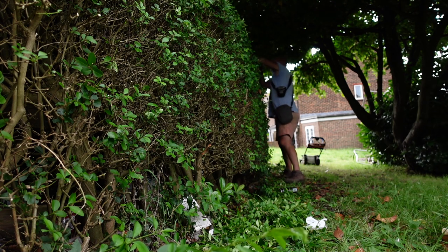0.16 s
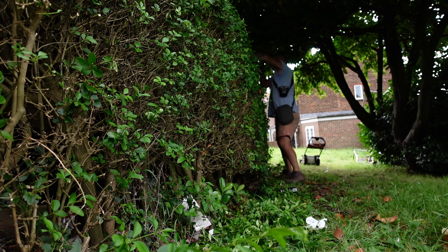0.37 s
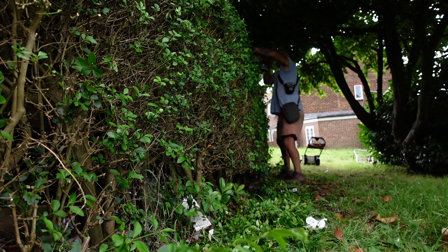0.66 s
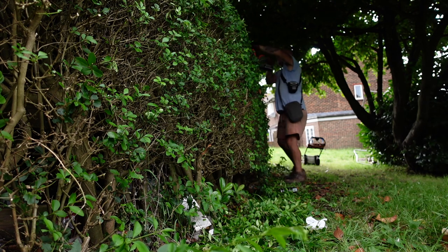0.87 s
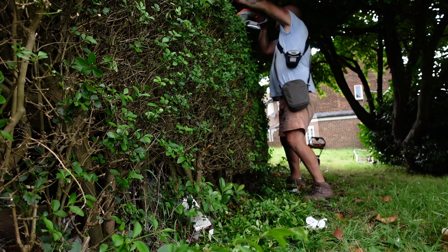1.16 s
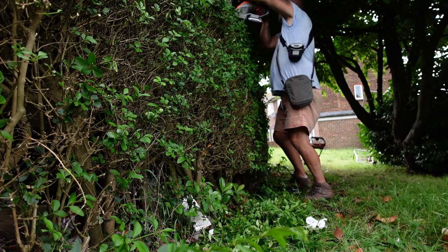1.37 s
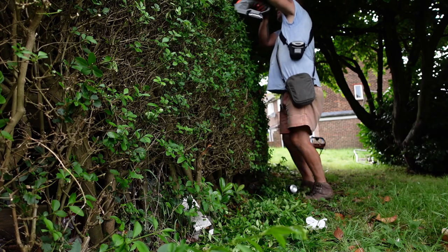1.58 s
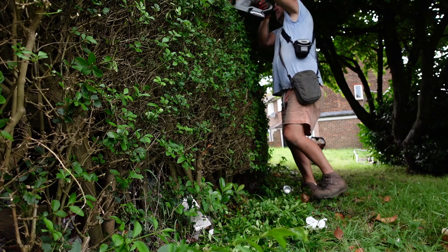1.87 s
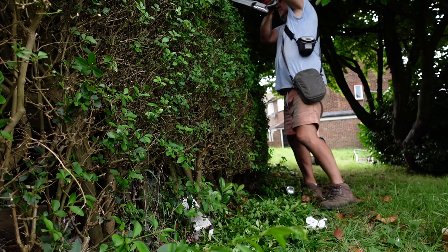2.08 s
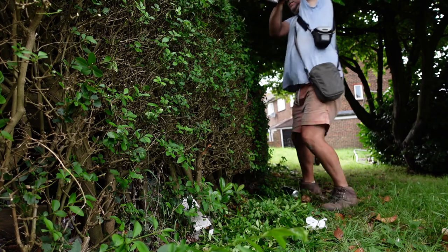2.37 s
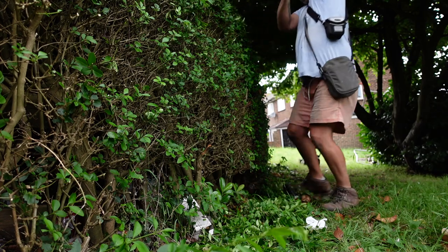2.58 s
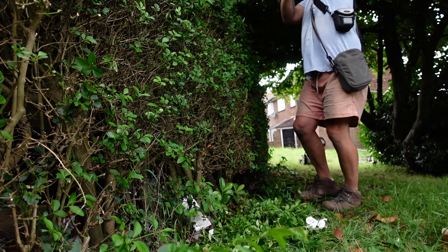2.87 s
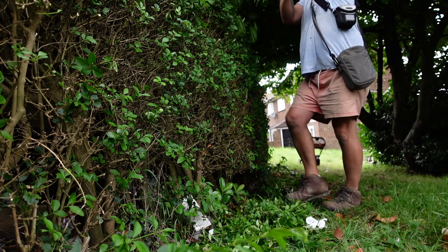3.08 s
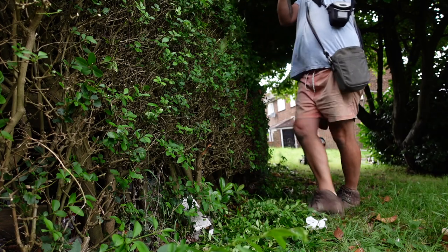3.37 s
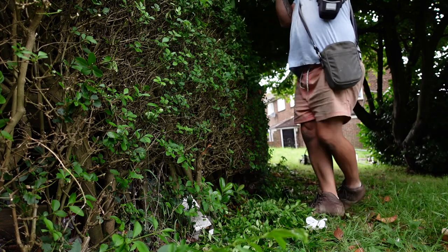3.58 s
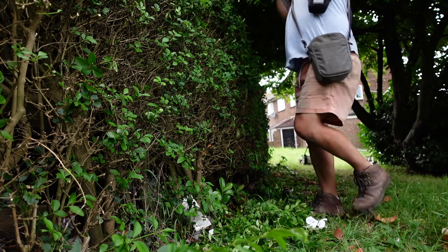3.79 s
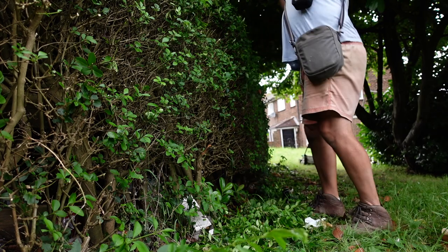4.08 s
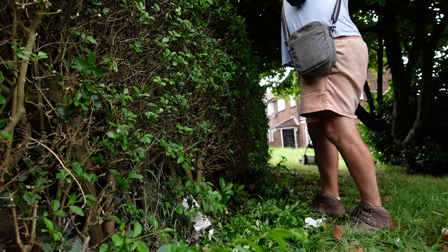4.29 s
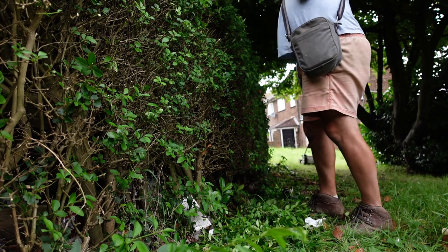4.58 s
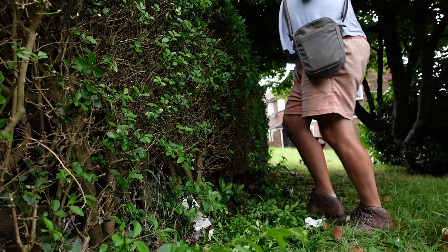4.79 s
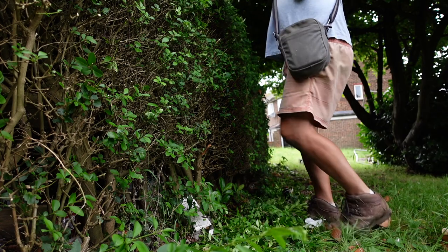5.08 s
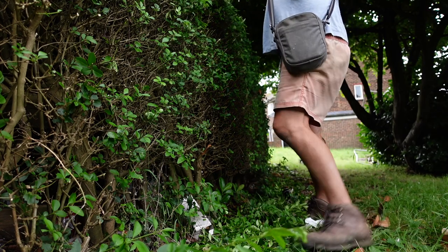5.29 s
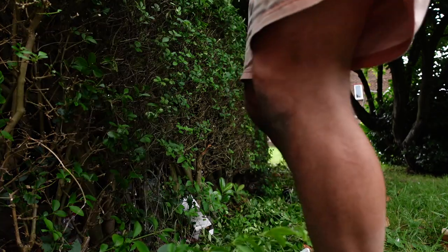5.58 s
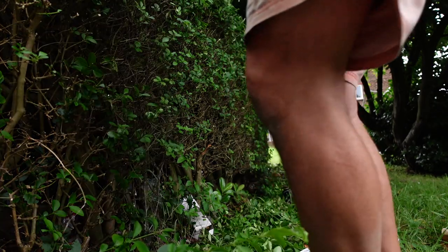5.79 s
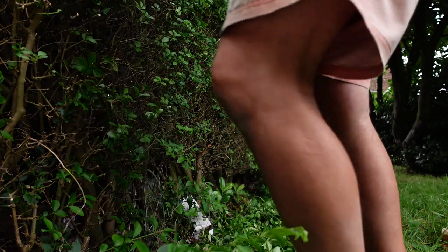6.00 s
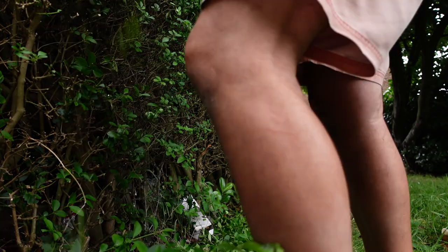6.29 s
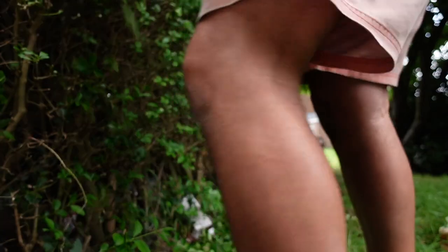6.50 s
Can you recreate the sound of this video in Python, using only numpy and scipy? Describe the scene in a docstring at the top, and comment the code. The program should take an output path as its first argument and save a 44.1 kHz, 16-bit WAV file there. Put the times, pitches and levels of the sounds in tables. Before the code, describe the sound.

An electric hedge trimmer whines roughly outdoors, its pitch sagging as it bites through crackling twigs and its blades clattering fast when it runs free.

```python
"""An electric hedge trimmer whines roughly, already biting at the start; between bites it runs free.
Its gear teeth make rough tones that sag in pitch under load, and the blades clack at each stroke when free.
Its tone and echo change at 1.17 and 5.39 s. Twigs crackle as random snaps over a steel hiss. Behind are a
filtered-noise garden rumble, a few dull thuds, and a far engine made of two low tones, silent from 5.38 s."""
import sys
import numpy as np
from scipy import signal
from scipy.fft import rfft, irfft, next_fast_len
from scipy.io import wavfile
from scipy.ndimage import uniform_filter1d, map_coordinates

SR = 44100
rng = np.random.default_rng(int(sys.argv[2]) if len(sys.argv) > 2 else 0)


def transcribe(signal):
    """Save signal, clipped to [-1, 1], as a 16-bit WAV file at the path in sys.argv[1]."""
    frames = np.atleast_2d(signal).T
    limited = np.clip(frames, -1, 1)
    pcm = np.round(limited * 32767).astype(np.int16)
    wavfile.write(sys.argv[1], SR, pcm)


N = 293265

# Garden rumble over time: time_s, low_db, upper_db
RUMBLE_LEVELS = [(0, -58, -49.5), (1.1, -59, -52), (1.28, -57, -42.5), (2.9, -58, -53), (3.4, -54, -47),
                 (4.3, -46, -52), (4.67, -43, -60), (5.35, -58, -54), (5.42, -86, -58), (5.9, -80, -57),
                 (6.1, -61, -58), (6.65, -73, -55)]
# Tone colour of the low rumble: pitch_hz, gain_db
RUMBLE_COLOUR = [(20, -22), (40, -23), (70, -6), (130, 0.5), (180, -6), (260, -21.5)]
# Far engine: time_s, firing_rate_hz, level_db, second_multiple_db
ENGINE = [(0, 82.7, -62, -71), (.6, 84.8, -67, -69.5), (1.4, 85.3, -65, -76), (2, 86.2, -68, -61),
          (2.84, 86.8, -57.5, -56), (3.12, 94.4, -50, -58), (3.2, 94.2, -60, -59), (3.3, 95.6, -49, -57),
          (3.41, 95.6, -46, -56), (3.48, 93.8, -54, -51), (3.62, 93.7, -43, -52), (3.72, 93.7, -47, -48),
          (3.81, 93.9, -54, -58), (4.0, 94, -50, -56), (4.14, 93.8, -43, -57), (4.24, 92, -58, -58),
          (4.35, 92, -51, -60), (4.45, 92.4, -63, -63), (4.52, 94.5, -52.5, -55), (4.72, 99, -51, -54.5),
          (5.0, 98.8, -59, -52.5), (5.23, 98.9, -49, -55), (5.38, 98.9, -56, -54)]
# Soft thuds on the lawn: start_s, level_db (before the soft attack), pitch_hz, time_to_fall_60_db_s
THUDS = [(2.074, -32, 233, 0.14), (3.38, -34, 208, .12), (6.005, -39, 162, 0.17)]

# Blade speed: time_s, strokes_per_s
SPEED = [(0.0, 37.82), (0.35, 36.64), (0.5, 36.25), (0.68, 34.75), (0.77, 32.55), (0.86, 30.25),
         (0.95, 32.55), (1.0, 33.65), (1.08, 38.77), (1.165, 38.91), (1.175, 32.12), (1.28, 32.72),
         (1.36, 35.12), (1.5, 34.32), (1.58, 34.82), (1.66, 32.52), (1.78, 34.42), (1.9, 32.12),
         (2.1, 31.02), (2.3, 30.42), (2.44, 27.42), (2.53, 29.82), (2.7, 30.02), (2.82, 31.72),
         (3.05, 33.42), (3.18, 38.51), (3.45, 39.41), (4.2, 39.95), (4.35, 38.93), (4.45, 31.78),
         (4.56, 30.48), (4.66, 27.58), (4.8, 28.78), (4.9, 31.38), (5.02, 32.58), (5.1, 29.18),
         (5.2, 28.28), (5.32, 29.98), (5.39, 32.98), (5.45, 30.88), (5.55, 29.68), (5.62, 30.58),
         (5.74, 30.5), (5.83, 33.7), (5.89, 36.6), (5.96, 38.7), (6.15, 39.78), (6.65, 39.45)]
# Stretches of hedge: start_s, whine of multiples 1, 2, 3 and 4-8 under load (four columns, relative_db),
# multiple_2_free_db, shaft_hum_cutting_db, shaft_hum_free_db
CUTS = [(0, -2.5, -5, -14, -26, -20, -52, -42), (.72, -6, -5, -15, -17, -19, -57, -42),
        (.99, -8, -6.5, -29, -22, -16, -48, -42), (1.17, 1, -7.5, -14.5, -13.5, -21, -51, -52),
        (1.45, 0, -11, -7, -13.5, -21, -52.5, -52), (1.9, 0, -7.5, -5.5, -11, -21, -53.5, -52),
        (2.33, -7, -9.5, -6.5, -11.5, -21, -55, -52), (3.07, -9, -10, -5, -18, -26, -50, -51),
        (4.3, -6, -13.5, -16, -22, -25, -61, -51), (4.85, -3, -18, -18, -18, -25.5, -62, -52),
        (5.07, -5, -10, -17.5, -16.5, -25, -63, -51), (5.39, -2, -5.5, -12.5, -10.5, -14.5, -54.5, -48.5)]
# Whine running free: level_db of multiples 1, 3 and 4-8
WHINE_FREE_DB = [-10.5, -18, -25]
# Change of the loaded whine in a full bite: change_db of multiples 1, 2, 3 and 4-8
WHINE_BITE_DB = [-20, 0.8, 3.5, 3]
# Upper multiples of the gear pitch: multiple_number, relative_db
UPPER_MULTIPLES = [(4, 0), (5, -3.5), (6, -1.5), (7, -0.5), (8, -1)]
# Reversals that knock differently from the rest: time_s, extra_db
HARD_KNOCKS = [(3.39, 3), (3.618, 2), (3.67, -1), (3.846, 2), (3.871, 3), (3.897, 3.5), (3.921, 3.5),
               (4.022, 4), (4.072, 3.5), (4.222, 4), (6.11, 6), (6.16, 2), (6.262, -1), (6.313, 2),
               (6.338, 4), (6.412, 0), (6.437, 0), (6.54, 4)]
# Ringing tones of the blade bar: pitch_hz, width_hz, level_db
BAR_MODES = [(1235, 470, -5), (2420, 210, 4), (2950, 160, -2), (3185, 59, 4.5), (3480, 85, 0.5),
             (3780, 96, 2.5), (4180, 99, 0), (6300, 670, -11.5), (7620, 1200, -7)]
# Tone colour of the cutting sound, then of the clacks: pitch_hz, gain_db
CUTTING_COLOUR = [(60, -60), (150, -45), (250, -57), (373, -25.5), (1260, -10), (1550, -8.5), (1910, 0),
                  (2230, -1), (3830, -0.5), (4790, -3.5), (9610, -6), (15900, -21.5)]
CLACK_COLOUR = [(150, -64), (250, -26), (566, -11), (850, -13.5), (1170, -9), (1600, -2.5), (3830, -0.5),
                (4790, -0.5), (6670, -2), (10500, -7.5), (15900, -17.5)]
# Resonances of the housing: pitch_hz, width_hz, lift_db
HOUSING = [(552, 425, 7), (1210, 400, 2), (1960, 1200, -1), (2860, 320, 2), (4000, 220, 3.5)]
# Bands that ring for a while: start_s, end_s, from_hz, to_hz, width_hz, lift_db
RINGS = [(0, .55, 3320, 3100, 200, 3.5), (0, .5, 1160, 1120, 150, -1), (.55, 0.987, 5600, 5330, 500, 3.5),
         (.75, 1.006, 8500, 8000, 400, 8.5), (1.17, 3.3, 7810, 7600, 300, 3.5),
         (1.17, 1.65, 6840, 6500, 398, 2), (1.165, 2.996, 1340, 1200, 150, 3.5),
         (1.4, 2.9, 9400, 9190, 302, 3), (2.003, 3.1, 6200, 6100, 250, 5),
         (2.3, 2.95, 5150, 5200, 301.7, 2), (3.05, 3.697, 6210, 6740, 302, 3),
         (4.257, 5.15, 7880, 8600, 350, 3), (4.398, 5.853, 6500, 6350, 350, 2),
         (4.55, 4.8, 2400, 2420, 200, 6), (5.1, 5.345, 2400, 2510, 200, 1.5),
         (4.3, 4.948, 3890, 3780, 250, 4.5), (4.4, 4.62, 2850, 2840, 150, 3.5),
         (4.55, 5.05, 3300, 3240, 200, 4.5), (0.402, 0.801, 3150, 3130, 201.3, 4),
         (5.301, 5.8, 930, 900, 120, 3.5), (3.2, 3.45, 2350, 2390, 130, 3.5),
         (3.2, 4.4, 1210, 1300, 330, 3.5), (5.88, 6.67, 1120, 1210, 280, 3.5),
         (1.3, 2.0, 4120, 3980, 300, 3), (4.5, 4.84, 1780, 1730, 170, 4), (5.06, 5.32, 1760, 1720, 170, 2),
         (4.851, 6, 5280, 5650, 300, 1.5), (4.95, 5.4, 7530, 7350, 400, 3.5), (5, 5.35, 3430, 3480, 300, 3),
         (5.333, 5.69, 3870, 3640, 302, 2), (5.389, 5.8, 2320, 2300, 300, 4.5),
         (5.9, 6.102, 2350, 2480, 300, 3), (6.06, 6.67, 3670, 4000, 400, 4)]
# Echo path off the lawn: start_s, end_s, start_delay_ms, end_delay_ms, start_strength, end_strength (0-1)
LAWN = [(0, 1.17, 0.83, 1.1, .03, .12), (1.17, 5.39, 1.5, 1.9, 0.16, 0.062),
        (5.39, 6.65, 1.18, .9, 0.068, .01)]
# Tone of the trimmer from each start on: start_s, then a list of pitch_hz, gain_db
TONE_CHANGES = [(0, [(400, -4.5), (900, 4.5), (2000, -1.5), (4500, -3), (8000, -2.5), (14000, -9)]),
                (1.17, [(400, 3), (900, 4.5), (2000, -1.5), (4500, -0.5), (8000, 0.5), (14000, -5)]),
                (5.39, [(400, 4.5), (900, 4.5), (2000, 2.5), (4500, 1), (8000, 2), (14000, 2.5)])]
# Brief changes in level, mostly dips: time_s, change_db
LEVEL_CHANGES = [(0.459, 1), (.52, -1.5), (.94, -3.5), (1.001, -5), (1.05, -5.5)]

# Left-right balance and stereo width over time: the sound moves to the centre and narrows:
# time_s, left_minus_right_db (before filtering), width_change_db (low and middle range)
BALANCE = [(0, -1.8, 2), (.8, -1.8, 2), (1.5, -.9, 0), (4.3, -.8, -2), (4.6, -.4, -7), (5.4, -.1, -9),
           (6.65, 0, -9)]
# Tone colour of the scattered stereo part: pitch_hz, gain_db
SPREAD = [(60, -70), (130, -55), (220, -28), (400, -21), (900, -22.5), (1500, -46), (2500, -29),
          (4500, -26), (8000, -13), (14000, -10)]
# Fixed difference between the two channels: pitch_hz, left_minus_right_db
LEAN = [(5000, 0), (8000, -.5), (12000, 1.3), (15000, 1.5)]

# Strokes per second running free, and strokes per second lost in a full bite
FREE_RATE, STALL_SAG = 40.73, 10.2
FIRST_STROKE = .39  # part of a stroke still to go before the first reversal
TEETH_PER_STROKE, TURNS_PER_STROKE = 30.3, 8.12  # gear teeth met and motor turns in one stroke
GRIP_BITE, GRIP_SPAN = 0.2, 0.11  # bite where the teeth start to take load, and the range it takes
LET_GO_S = 0.0517  # the teeth stay pressed while the motor regains speed
RUN_UP_DB = -0.1454  # from multiple 4 up, per stroke/s gained each second; less for lower multiples
CHOP_DB = 1.5  # every stroke presses the teeth differently
KNOCK_RISE = 0.011  # part of a stroke
RING_FADE_S, RING_FLUTTER = 0.098, .3  # swell and fade time; share of the lift that comes and goes
FREE_DB, CUTTING_DB, LOUD_BITE = -19.5, -16.5, 0.62  # level running free, and from this bite on
LEVEL_CHANGE_S = 0.014
TOP_HZ = 15900


def undb(db):
    """Turn decibels into a plain gain."""
    return 10 ** (np.asarray(db) / 20)


def unit(x):
    """Scale to an average (rms) level of 1."""
    return x / np.sqrt(np.mean(x ** 2))


def curves(table):
    """Join the rows of a table with straight lines over time."""
    s, *columns = np.transpose(table)
    return [np.interp(np.arange(N) / SR, s, column) for column in columns]


def steps(table):
    """Hold each row of a table until the next starts."""
    s, *columns = np.transpose(table)
    row = np.searchsorted(s, np.arange(N) / SR, "right") - 1
    return np.array(columns)[:, row]


def walk(rate):
    """Random wander: levels held for 1 / rate seconds, smoothed twice, with rms 1."""
    hold = int(SR / rate)
    held = np.repeat(rng.standard_normal(N // hold + 1), hold)
    smooth = uniform_filter1d(uniform_filter1d(held, hold), hold)
    return unit(smooth[:N])


def colour(x, points, share=1):
    """Change the tone by gains at given pitches, joined on a log-pitch axis."""
    size = next_fast_len(N)
    hz, db = np.transpose(points)
    bin_hz = np.arange(size // 2 + 1) * SR / size
    gain = undb(share * np.interp(np.log(bin_hz + 1), np.log(hz), db))
    return irfft(rfft(x, size) * gain, size)[..., :N]


def ring(x, hz, width_hz):
    """A resonance with gain 1 at its centre."""
    return signal.lfilter(*signal.iirpeak(hz, hz / width_hz, SR), x)


def glide(x, hz, width_hz):
    """A resonance with a moving centre: shift it to zero pitch, smooth, shift back."""
    turn = np.exp(2j * np.pi * np.cumsum(hz) / SR)
    keep = np.exp(-1.55 * np.pi * width_hz / SR)
    smooth = signal.lfilter([(1 - keep) ** 2], [1, -2 * keep, keep ** 2], x / turn)
    return 2 * (smooth * turn).real


def scatter(x, count, fade_s, rate):
    """Short random echoes off leaves, their mix drifting; scaled by echo energy."""
    t = np.arange(SR // 30) / SR
    leaves = rng.standard_normal((count, len(t))) * np.exp(-t / fade_s)
    echoes = sum(walk(rate) * signal.fftconvolve(x, leaf)[:N] for leaf in leaves)
    return echoes / np.sqrt(np.sum(leaves ** 2))


def garden():
    """Far traffic: noise shaped into a low rumble and a band above it that comes and goes."""
    low_db, upper_db = curves(RUMBLE_LEVELS)
    low = unit(colour(rng.standard_normal(N), RUMBLE_COLOUR))
    upper = unit(ring(ring(rng.standard_normal(N), 257, 210), 257, 210))
    low = low * undb(low_db + 2.5 * walk(4.65))
    return low + upper * undb(upper_db + 0.44 * walk(7.9))


def engine():
    """Two low multiples of a far engine's firing rate, throbbing on the air."""
    hz, first_db, second_db = curves(ENGINE)
    turn = 2 * np.pi * np.cumsum(hz * (1 + 0.008 * walk(9))) / SR
    first = undb(first_db + walk(8.1)) * np.sin(turn)
    second = undb(second_db + 3.0 * walk(14)) * np.sin(2 * turn)
    running = np.arange(N) / SR < ENGINE[-1][0]
    return np.sqrt(2) * (first + second) * running


def thuds():
    """Boots on grass: each gives a short dull ring with a soft attack."""
    out = np.zeros(N)
    t = np.arange(SR // 2) / SR
    for s, db, hz, t60 in THUDS:
        shape = (1 - np.exp(-t / 0.0056)) * 1000. ** (-t / t60)
        thud = undb(db) * np.sin(2 * np.pi * hz * t) * shape
        first = int(s * SR)
        out[first:first + len(t)] += thud[:N - first]
    return out


def twigs(stroke, bite):
    """Sliding steel hisses; stems and leaves crackle in dense small snaps."""
    snap_here = rng.random(N) < 3000 / SR  # about 3000 a second
    snap_size = undb(1.6 * np.minimum(rng.exponential(size=N), 3))
    snaps = snap_here * snap_size * rng.standard_normal(N)
    snaps = signal.lfilter([1], [1, -.4], snaps)
    # the hiss weakens late in each stroke
    hiss = rng.standard_normal(N) * (1 - .5 * np.exp(-((stroke % 1 - .76) / 0.047) ** 2))
    patchy = undb(0.18 * walk(24.81) + 0.82 * walk(70))
    return patchy * (unit(hiss) * undb(-3.5 + 9.0 * bite) + unit(snaps) * undb(-9 + 1.4 * bite))


def knocks(stroke):
    """With play in the drive each reversal knocks twice and rattles on, never alike; rms 1."""
    chance = rng.standard_normal((int(stroke[-1]) + 3, 6))
    hard_db = np.zeros(len(chance))
    for s, db in HARD_KNOCKS:
        turn = int(stroke[int(s * SR)] + 1.25)
        hard_db[turn] = db
        chance[turn, ::3] = 0  # no chance in the first knock's timing and level
    burst = 0
    # first knock, second knock, rattle: delay in strokes, level dB, fade in strokes
    for k, (lag, db, hold) in enumerate([(0.00059, -3.0, 0.066), (.29, -8, 0.12), (0, -17.5, 0.57)]):
        late = stroke + 1 - lag
        turn = late.astype(int)
        since = late - turn - np.clip(0.039 + 0.019 * chance[turn, k], 0, .2)
        level_db = db + (k == 0) * hard_db[turn] + 1.67 * chance[turn, 3 + k]
        rise = np.clip(since / KNOCK_RISE, 0, 1)
        burst = burst + undb(level_db) * rise * np.exp(-np.abs(since / hold) ** 0.62)
    return unit(burst)


def clacks(stroke, bite, burst):
    """Each burst rings the blade bar in its own mix of tones; a bite takes up the play."""
    grit = burst * undb(1.66 * walk(700)) * rng.standard_normal(N)
    mix = rng.standard_normal((int(stroke[-1]) + 3, len(BAR_MODES)))[(stroke + .05).astype(int)]
    bar = 0
    for k, (hz, width_hz, db) in enumerate(BAR_MODES):
        bar = bar + undb(db + 3.2 * mix[:, k]) * ring(grit, hz, width_hz)
    return (grit + bar) * undb(-1.0 - 10.3 * bite)


def grip(bite, loaded, free):
    """Blend from running free to loaded as the blades bite."""
    return free + (loaded - free) * np.clip((bite - GRIP_BITE) / GRIP_SPAN, 0, 1)


def gears(speed, stroke, bite, burst):
    """Teeth meet unevenly, giving rough bands at multiples; the blades drag the speed in each stroke."""
    # with no load the teeth chatter, which widens the bands
    chatter = (.085 - .065 * bite ** .5) * walk(350)
    wobble = 1 + chatter + .016 * np.sin(2 * np.pi * stroke) + .01 * walk(60)
    mesh = 2 * np.pi * np.cumsum(TEETH_PER_STROKE * speed * wobble) / SR

    cut = steps(CUTS)
    free_db = [WHINE_FREE_DB[0], cut[4], *WHINE_FREE_DB[1:]]
    levels_db = [grip(bite, db + change * bite, free)
                 for db, change, free in zip(cut, WHINE_BITE_DB, free_db)]
    *low_db, upper_db = levels_db
    parts = list(enumerate(low_db, 1)) + [(k, db + upper_db) for k, db in UPPER_MULTIPLES]

    chop = CHOP_DB * rng.standard_normal((int(stroke[-1]) + 3, len(parts)))[(stroke + .24).astype(int)].T
    # speed gained each second, smoothed
    gaining = uniform_filter1d(np.clip(np.gradient(speed) * SR, 0, 60), SR // 20)
    whine = 0
    for k, db in parts:
        run_up_db = min(k - 1, 3) / 3 * RUN_UP_DB * gaining
        # each multiple catches and lets go
        catch_db = 1.2 * walk(40) + 1.43 * walk(90) + 2.1 * walk(160)
        whine = whine + undb(db + chop[k - 1] + run_up_db + catch_db) * np.sin(k * mesh + k * k)

    # lightly loaded teeth touch mostly in the knocks; loaded ones part only just before the blades reverse
    pressed = np.clip(.3 + .75 * bite, 0, 1)
    slack = np.clip(1 - 2.0 * np.exp(-((stroke % 1 - .76) / 0.04) ** 2), 0, 1)
    # out and back strokes load the crank unequally
    crank = 1 + 0.12 * np.cos(np.pi * (stroke - .3))
    return whine * (pressed + (1 - pressed) * burst) * slack * crank


def rings(x):
    """Each ringing band is a resonance that swells in, slides, flutters and fades."""
    t, out = np.arange(N) / SR, x
    for s, end, from_hz, to_hz, width_hz, db in RINGS:
        on = np.clip(np.minimum(t - s, end - t) / RING_FADE_S + .5, 0, 1)
        lift = undb(db * on * (1 + RING_FLUTTER * walk(14))) - 1
        hz = np.interp(t, [s, end], [from_hz, to_hz])
        out = out + lift * glide(x, hz, width_hz)
    return out


def paths(x):
    """Sound going straight, off the lawn and through the hedge adds up to bands that slide."""
    start, end, ms0, ms1, share0, share1 = steps([(row[0], *row) for row in LAWN])
    along = (np.arange(N) / SR - start) / (end - start)
    delay_ms = ms0 + (ms1 - ms0) * along
    strength = share0 + (share1 - share0) * along
    late = map_coordinates(x, [np.arange(N) - delay_ms * SR / 1000], order=3)
    # grass soaks up the treble
    late = colour(late, [(3500, 0), (7000, -10)])
    no_bass = signal.butter(1, 2500, "high", fs=SR, output="sos")
    hedge = signal.sosfilt(no_bass, scatter(x, count=3, fade_s=0.0024, rate=2.475))
    return x + np.clip(strength, 0, 1) * late + .11 * hedge


def shaft_hum(speed, bite):
    """The motor shaft hums once a turn and stumbles on thick stems."""
    stumble = 1 + 0.031 * bite * walk(25)
    turn = 2 * np.pi * np.cumsum(TURNS_PER_STROKE * speed * stumble) / SR
    cutting_db, free_db = steps(CUTS)[-2:]
    return np.sqrt(2) * undb(grip(bite, cutting_db, free_db) + 0.5 * walk(11)) * np.sin(turn)


def trimmer():
    """Slower blades mean a bigger bite; gears, twigs and clacks together ring the housing."""
    speed, = curves(SPEED)
    stroke = np.cumsum(speed) / SR + 1 - FIRST_STROKE
    bite = np.clip((FREE_RATE - speed) / STALL_SAG, 0, 1)
    keep = np.exp(-1 / (LET_GO_S * SR))
    bite = np.maximum(bite, signal.lfilter([1 - keep], [1, -keep], bite))

    burst = knocks(stroke)
    cutting = gears(speed, stroke, bite, burst) + twigs(stroke, bite)
    drive = colour(cutting, CUTTING_COLOUR) + colour(clacks(stroke, bite, burst), CLACK_COLOUR)
    body = drive + sum((undb(db) - 1) * ring(drive, hz, width_hz) for hz, width_hz, db in HOUSING)
    body = paths(rings(body))
    heard = np.empty(N)
    for s, tone in TONE_CHANGES:
        heard[int(s * SR):] = colour(body, tone)[int(s * SR):]

    t = np.arange(N) / SR
    level_db = FREE_DB + (CUTTING_DB - FREE_DB) * np.clip(bite / LOUD_BITE, 0, 1)
    level_db = level_db + sum(db * np.exp(-((t - s) / LEVEL_CHANGE_S) ** 2) for s, db in LEVEL_CHANGES)
    # even out the loudness, then set it
    heard = heard / np.sqrt(uniform_filter1d(heard ** 2, SR // 6)) * undb(level_db)
    return heard + shaft_hum(speed, bite)


def scene():
    """The trimmer over the garden; scattered sound differs between the two stereo channels."""
    tool = trimmer()
    mid = tool + garden() + engine() + thuds()
    pan_db, width_db = curves(BALANCE)
    side = colour(scatter(mid, count=10, fade_s=0.0041, rate=8.9), SPREAD)
    below = colour(side, [(6000, 0), (7500, -40)])
    # direction is heard mainly above the low middle
    upper = colour(tool, [(150, -45), (600, -20), (2500, -2), (4500, 2), (9000, -2), (12000, -20)])
    side = side + (undb(width_db) - 1) * below
    side = side + np.tanh(pan_db * np.log(10) / 40) * upper
    return np.array([colour(mid, LEAN, .5) + side, colour(mid, LEAN, -.5) - side])


def record(dry):
    """The camera rounds the loudest peaks, thins the deep bass and cuts the top steeply."""
    # one gain for both channels
    loud = np.abs(dry).max(axis=0) + 1e-9
    rounded = dry * .9 * np.tanh(loud / .9) / loud
    thin = signal.sosfilt(signal.butter(2, 60, "high", fs=SR, output="sos"), rounded)
    return signal.sosfilt(signal.ellip(10, .2, 80, TOP_HZ, fs=SR, output="sos"), thin)


dry = scene()
out = record(dry)
transcribe(out)
```